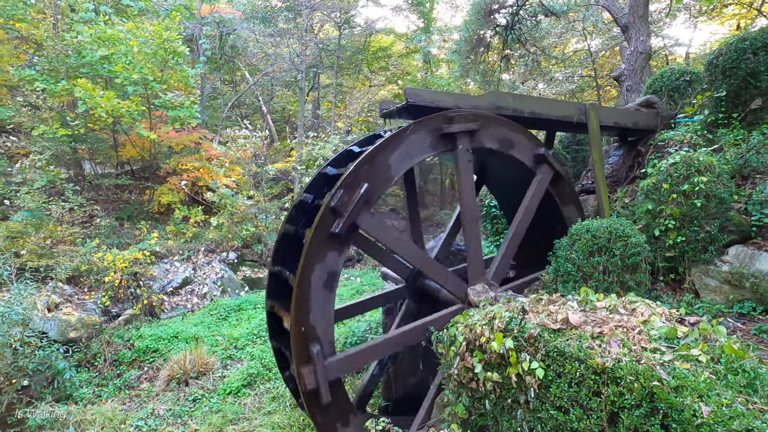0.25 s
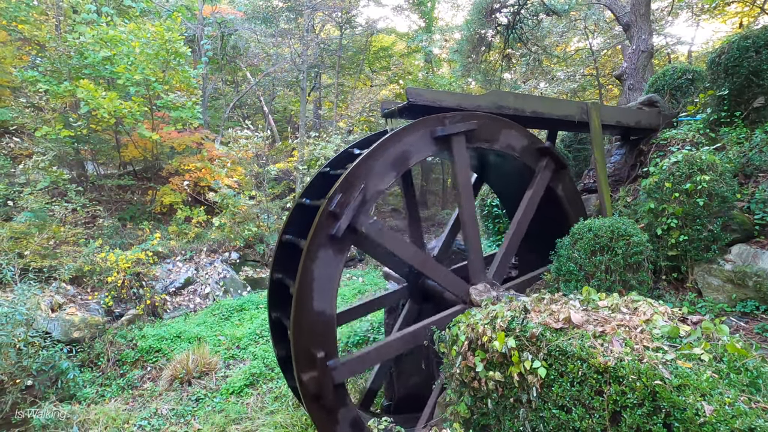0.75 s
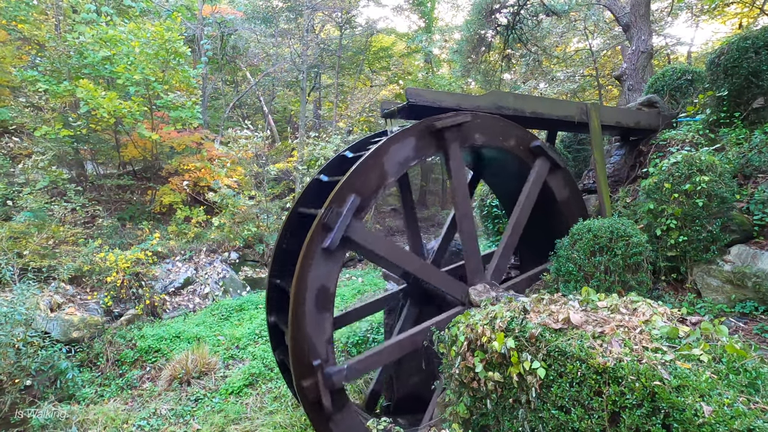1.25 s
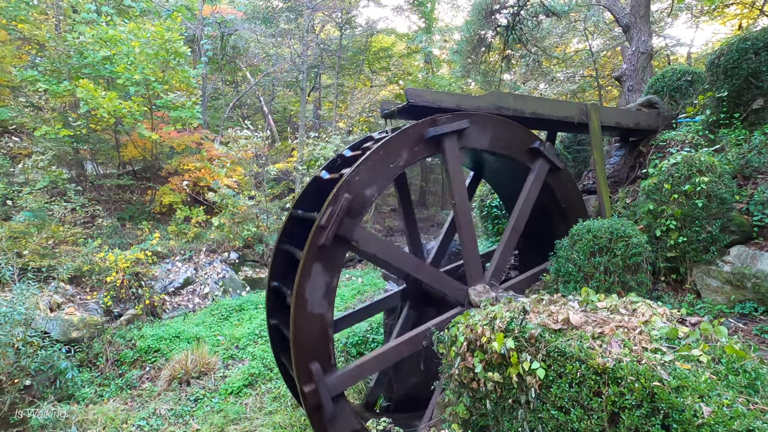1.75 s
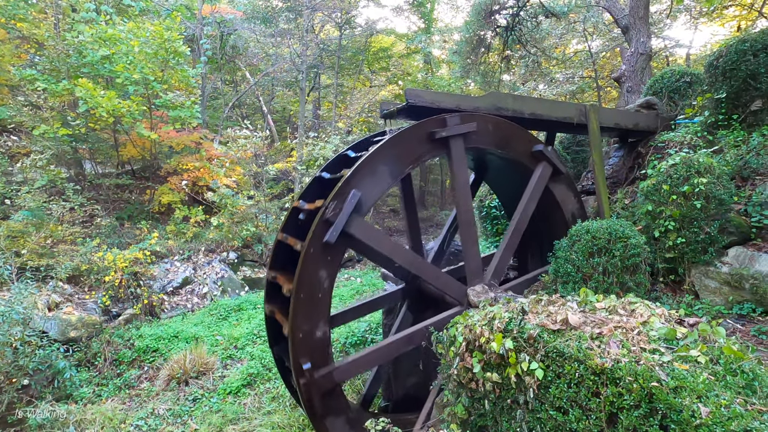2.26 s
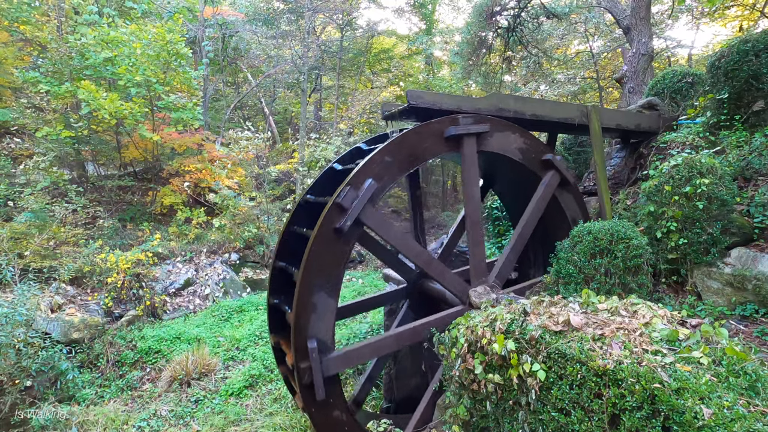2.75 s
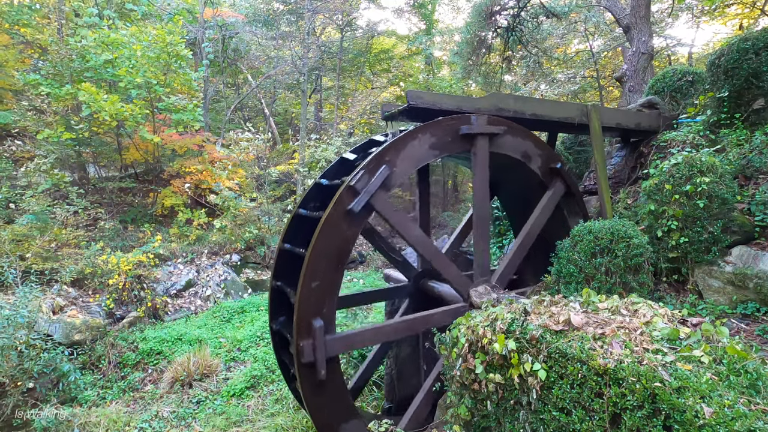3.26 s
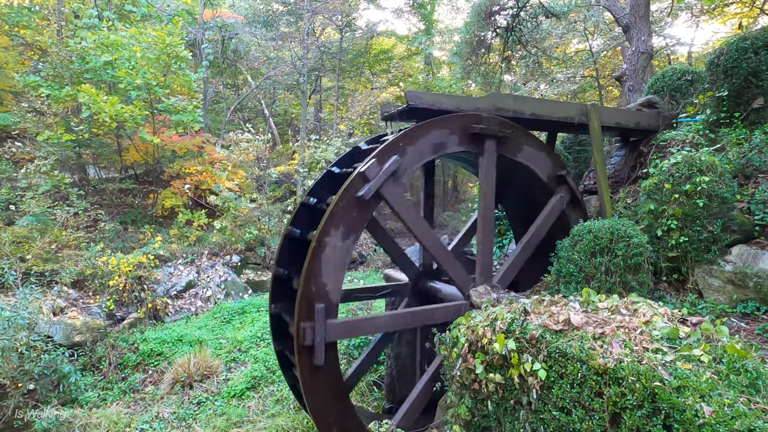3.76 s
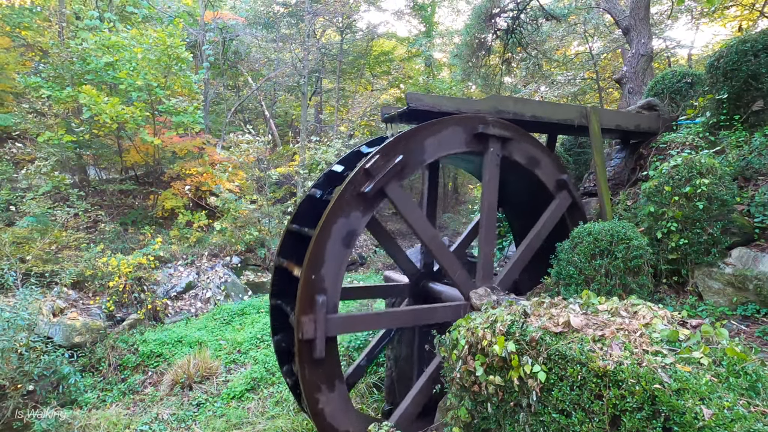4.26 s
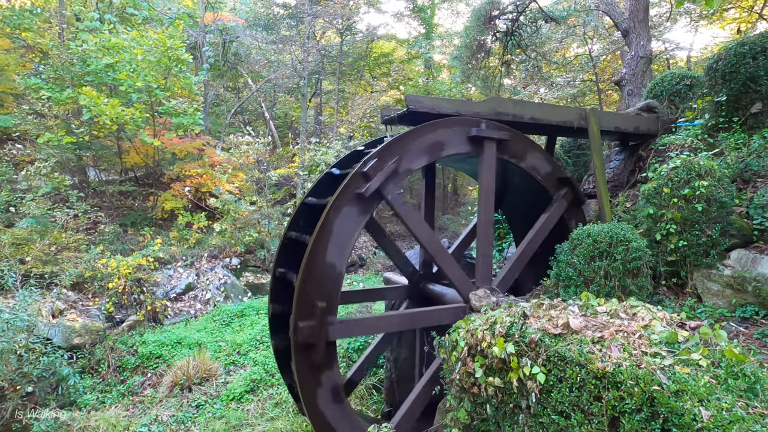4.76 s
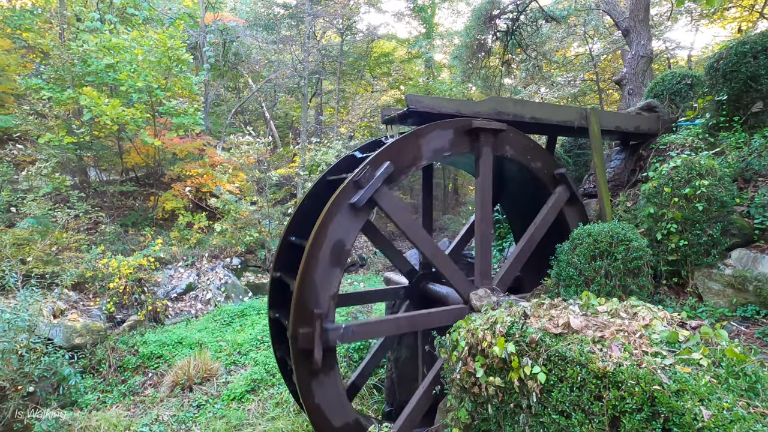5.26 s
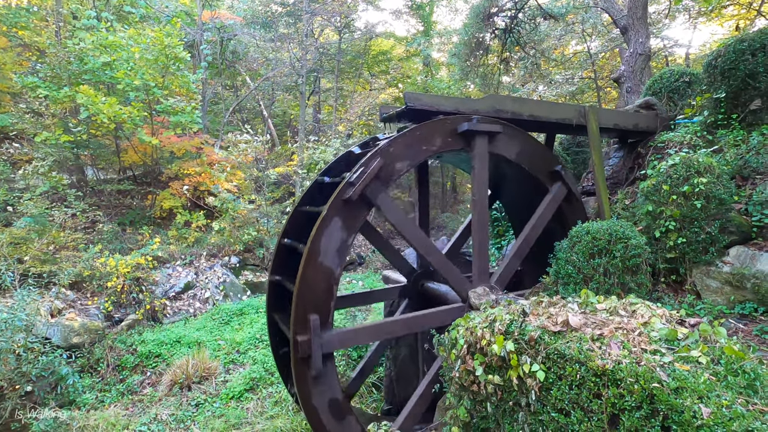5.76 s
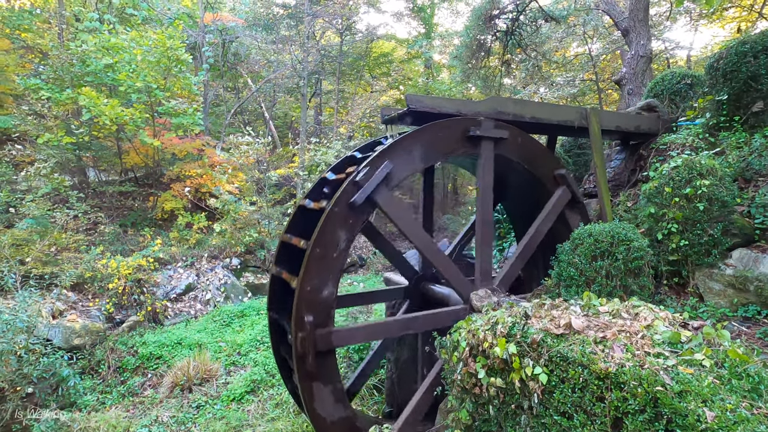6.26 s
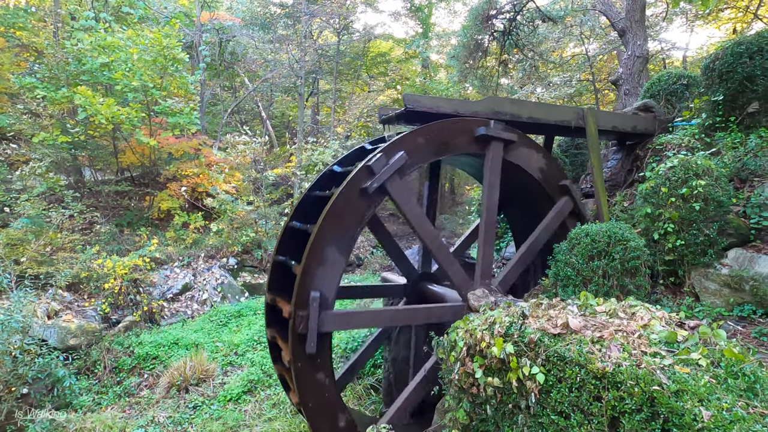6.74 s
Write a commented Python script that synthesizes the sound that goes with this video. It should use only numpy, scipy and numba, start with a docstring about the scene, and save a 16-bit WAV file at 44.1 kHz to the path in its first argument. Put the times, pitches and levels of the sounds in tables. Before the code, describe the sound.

Water spills from wheel buckets in irregular bursts: crisp loud drips, pattering droplets and small bubbly gurgles, fuller around two seconds and again near the end. The busiest, loudest drips come just before five seconds. Behind them lie a steady, flickering stream hiss, a low throbbing engine far away and two soft wind puffs. Outdoors, wide stereo, close to the water, with a short stony echo.

```python
"""Water spills from the buckets of a wooden garden wheel: drops tick and plink as short sines, trapped
bubbles gurgle as longer sines, most gliding upward, and thousands of tiny droplets fizz as spray.
All three echo in the wheel pit, over the hiss of the stream, made of flickering noise bands.
Far off an engine drones past as a few multiples of a bending firing rate, with a wavering hum;
low rumble and puffs of wind, both noise, lie underneath."""
import sys
import numpy as np
from scipy import signal
from scipy.fft import rfft, irfft, next_fast_len
from scipy.io import wavfile
from scipy.ndimage import uniform_filter1d, map_coordinates
from numba import njit

SR = 44100
rng = np.random.default_rng(int(sys.argv[2]) if len(sys.argv) > 2 else 0)


def transcribe(signal):
    """Save signal, clipped to [-1, 1], as a 16-bit WAV file at the path in sys.argv[1]."""
    frames = np.atleast_2d(signal).T
    limited = np.clip(frames, -1, 1)
    pcm = np.round(limited * 32767).astype(np.int16)
    wavfile.write(sys.argv[1], SR, pcm)


N = 308700
OPPOSITE = np.array([[1], [-1]])  # a part with opposite signs at the left and right microphones


def undb(db):
    """Gain of a dB value."""
    return 10 ** (np.asarray(db) / 20)


def level(x, db):
    """Scale to an rms level."""
    return x * undb(db) / np.sqrt(np.mean(x ** 2))


def curve(table):
    """Columns of a time table, joined by straight lines to one value a sample."""
    s, *columns = np.transpose(table)
    return [np.interp(np.arange(N) / SR, s, column) for column in columns]


def at_hz(table, hz):
    """Read (frequency [Hz], value) points on a log-frequency axis."""
    points_hz, values = np.transpose(table)
    return np.interp(np.log(hz), np.log(points_hz), values)


def band(hz, width):
    """Noise of rms 1 with a bell-shaped spectrum, drawn bin by bin."""
    size = next_fast_len(N)
    bins = np.zeros(size // 2 + 1, complex)
    lowest = max(1, int((hz - 3 * width) * size / SR))
    highest = min(size // 2, int((hz + 3 * width) * size / SR))
    k = np.arange(lowest, highest)
    bell = np.exp(-((k * SR / size - hz) / width) ** 2)
    bins[k] = bell * (rng.standard_normal((len(k), 2)) @ [1, 1j])
    return level(irfft(bins, size)[:N], 0)


def walk(rate):
    """Random levels every 1 / rate s, joined and smoothed; spread near 1."""
    k = int(SR / rate)
    joined = np.interp(np.arange(N) / k, np.arange(N // k + 2), rng.standard_normal(N // k + 2))
    return 1.4 * uniform_filter1d(joined, k)


def humps(s, db, length, rise, base_db):
    """Level in dB of a base plus humps that rise to their top at s and fall away; powers add.

    length spans the points at 1/e of the top power; rise is the share of it before the top."""
    late = np.arange(0, N + 64, 64)[:, None] / SR - s  # one row every 64 samples
    side_length = np.where(late < 0, rise, 1 - rise) * length
    shape = np.exp(-(late / side_length) ** 2)
    power = np.interp(np.arange(N) / 64, np.arange(len(late)), shape @ undb(db) ** 2)
    return 10 * np.log10(power + undb(base_db) ** 2)


@njit
def ring(length, start, hz, rise, t60, size, onset, shape):
    """Air pockets ring as sines that swell over the first cycles, glide in pitch and die.

    rise is in octaves per s, onset in radians of the sine; t60 in s takes the fade to -60 dB.
    Fade shape 1 is even, higher holds and then stops short."""
    out = np.zeros(length)
    for k in range(len(start)):
        first = int(start[k] * SR)
        last = min(length, first + int(.9 * t60[k] * SR))
        phase = 0.
        step = 2 * np.pi * hz[k] / SR
        climb = 2 ** (rise[k] / SR)
        for i in range(first, last):
            fade = 1000 ** -((i - first) / (t60[k] * SR)) ** shape
            swell = np.sin(np.pi / 2 * min(phase / onset, 1.)) ** 2
            out[i] += size[k] * fade * swell * np.sin(phase)
            phase += step
            step = min(step * climb, 2.5)
    return out


def pit(x, db):
    """Stone and boards under the wheel throw back single echoes that thicken into a short tail.

    db is the echo energy against the direct sound."""
    t60_s, gap_s = 0.065, 0.0016  # exponential part of the fade; silence before the first echo
    t = np.arange(int(.2 * SR)) / SR
    arrive = rng.random(len(t)) < t / .03  # sparse at first, every sample after 30 ms
    fade = 1000 ** (-t / t60_s) / np.sqrt(t + 0.00013)
    echoes = rng.standard_normal(len(t)) * fade * (t > gap_s) * arrive
    echoes = echoes * undb(db) / np.sqrt(np.sum(echoes ** 2))
    return x + signal.oaconvolve(x, echoes)[:N]


def spill():
    """How much water falls, as a level in dB: a thin trickle, the pours and the slops."""
    # buckets emptying: (time of fullest flow [s], level [dB], length [s])
    pours = [(0.19, -50, 0.65), (0.642, -44, 0.26), (0.9, -50, 0.15), (1.269, -52, 0.3), (2.097, -44.5, .3),
             (3.125, -52, 0.81), (4.79, -46.5, 0.59), (5.476, -48.5, 0.19), (6.26, -42, .19)]
    # short slops between the pours: (time of fullest flow [s], level [dB])
    slops = [(.98, -48), (1.029, -45), (1.17, -47), (1.518, -47.5), (1.63, -46), (1.775, -49), (1.872, -46),
             (2.36, -50), (2.54, -52), (2.94, -46), (3.34, -45), (3.49, -49), (3.8, -47.5), (3.91, -48),
             (4.08, -48), (4.191, -48), (4.37, -45), (5.13, -47), (5.788, -49), (6.041, -44), (6.965, -46)]
    trickle_db, slop_s = -55, 0.042
    pour_rise, slop_rise = .4, 0.6  # share of the length spent rising
    steady_db = humps(*np.transpose(pours), pour_rise, trickle_db)
    s, db = np.transpose(slops)
    return humps(s, db, slop_s, slop_rise, steady_db)


def spray(spill_db, count=13000):
    """Countless droplets in small flurries, denser and louder while more water spills.

    Most tick for a few cycles, few ring; half of them land further to the right."""
    # colour of the droplets: (pitch [Hz], relative level [dB])
    colour = [(500, -26), (1200, -16), (2500, 1), (4500, 4.5), (6800, 1.5), (7700, 4.5), (10000, -14),
              (14000, -12)]
    when, pitch, size, length = rng.random((count, 4)).T
    crowd_db = .4 * (spill_db - spill_db.mean())  # this part of the spill's power comes as more droplets
    crowd = np.cumsum(undb(2 * crowd_db))
    s = np.interp(when, crowd / crowd[-1], np.arange(N) / SR)
    sample = (s * SR).astype(int)
    hz = 500 * 28 ** pitch
    flurry_db = spill_db - crowd_db + 1.9 * walk(35.0)
    scatter_db = np.clip(2.9 - .15 * crowd_db[sample], 2.2, 3.4)  # thin flow patters, full flow washes
    size_db = scatter_db * (np.minimum(-np.log(1 - size), 4.0) - 1)
    db = flurry_db[sample] + at_hz(colour, hz) + size_db + 7.5
    rise = 60 * length  # octaves per s
    t60 = (2.7 + 16 * length ** 6) / hz
    rows = np.array([s, hz, rise, t60, undb(db)])
    ahead, aside = (pit(ring(N, *half.copy(), 2 * np.pi * 1.27, 1.78), -1.5)
                    for half in np.split(rows, 2, axis=1))
    return ahead + np.array([np.roll(aside, 1), aside])  # a sample later at the left


def bed(spill_db, roar_db):
    """Rumble and hiss in third-octave bands that flicker alone; bass follows the engine, treble the spill."""
    # rumble and stream: (frequency [Hz], relative level per Hz [dB])
    spectrum = [(24, -32), (40, 6.5), (69, -4), (192, 1.5), (342, -14.5), (817, -23.5), (1050, -22),
                (1350, -13), (1820, -16), (2060, -18), (3840, -20), (7710, -27.5), (12700, -42.5),
                (15500, -70)]
    # left-right likeness of the noise: (frequency [Hz], correlation [0-1])
    likeness = [(40, 0.98), (80, 0.99), (150, 0.92), (400, 0.79), (1200, 0.092), (3000, 0.55), (8000, 0.13),
                (13000, 0.033)]
    # the stream hisses in hollows of the pit: (centre [Hz], width [Hz], level [dB])
    hollows = [(1044, 100, -66.5), (1404, 83, -66), (2044, 60, -67)]
    bands_db = -44  # rms of all third-octave bands together
    out = 0
    fizz_db = .75 * (spill_db - spill_db.mean()) + 2.0 * walk(30.0)
    rumble_db = 0.37 * (roar_db - roar_db.mean())
    for hz in 40 * 2 ** np.arange(0, 8.7, 1 / 3):
        like = at_hz(likeness, hz)
        shared = np.sqrt(1 + like) * band(hz, hz / 6)
        apart = np.sqrt(1 - like) * band(hz, hz / 6) * OPPOSITE
        treble = np.clip(np.log2(hz / 900) / 2.84, 0, 1)
        bass = np.clip(np.log2(900 / hz), 0, 1)
        band_db = at_hz(spectrum, hz) + 10 * np.log10(hz)  # wider bands hold more power
        out = out + (shared + apart) * undb(band_db + 1.91 * walk(9.0) + treble * fizz_db + bass * rumble_db)
    hollow = sum(undb(db + 3.0 * walk(25.02)) * band(hz, width) for hz, width, db in hollows)
    return level(out, bands_db) + hollow


def low_multiples(roar_db):
    """Levels of the lowest engine multiples: tied to the roar, lifted by their own swells."""
    # level between swells: (multiple of the firing rate, level against the roar [dB])
    lower = [(1, -25), (2, -2), (3, -1.5)]
    # a low multiple swells and sinks back: (time of the top [s], multiple, level [dB], length [s])
    swells = [(0.182, 1, -46, 0.25), (0.198, 2, -43.5, 1), (1.645, 2, -46.5, 0.24), (3.203, 1, -49.5, 0.92),
              (3.808, 2, -41, 0.35), (5.27, 2, -51, 0.73)]
    rise_share = 0.23
    s, multiple, db, length = np.transpose(swells)
    levels = []
    for k, relative_db in lower:
        own = multiple == k
        levels.append(humps(s[own], db[own], length[own], rise_share, roar_db + relative_db))
    return levels


def engine(hz, low_db, roar_db):
    """Multiples of the firing rate nearly in step, so that firings throb; each flutters as the air path shifts."""
    # upper multiples: (multiple of the firing rate, level against the roar [dB])
    upper = [(4, -4), (5, -10.5)]
    phase = 2 * np.pi * np.cumsum(hz * (1 + 0.0022 * walk(6.07))) / SR
    multiples = list(enumerate(low_db, 1)) + [(k, roar_db + db) for k, db in upper]
    out = 0
    for k, db in multiples:
        sway = 0.3 / k * walk(3.0) * OPPOSITE  # the two sides drift apart in phase
        tone = np.cos(k * phase + .5 * walk(4.36) + sway)
        out = out + np.sqrt(2) * undb(db + 1.24 * walk(3.78)) * tone
    return out


def hum(hz, roar_db):
    """A second line, one sine, that bends with the engine and wavers in level and phase."""
    # hum: (highest pitch before the phase wavers [Hz], middle level [dB])
    hum_line = (197, -55)
    top_hz, middle_db = hum_line
    phase = 2 * np.pi * np.cumsum(top_hz * hz / hz.max()) / SR + 1.72 * walk(9.0)
    db = middle_db + 0.28 * (roar_db - roar_db.mean()) + 1.7 * walk(4.4)
    return np.sqrt(2) * undb(db) * np.cos(phase)


def wind():
    """Slow buffeting of low noise, partly unrelated at the two microphones."""
    # gusts on the microphones: (time of the top [s], level of each of two noises [dB], length [s])
    gusts = [(1.745, -43.5, 0.25), (5.35, -40.5, 0.26)]
    breeze_db, rise_share = -72, 0.39
    db = humps(*np.transpose(gusts), rise_share, breeze_db + 2.5 * walk(2.9))
    return undb(db) * (band(35.0, 42) + band(21, 25) * OPPOSITE)


def drops(count=3):
    """Each loud drop is a slap and a few cycles at its own pitch; softer ones ring longer.

    Drops land in a few places with their own echoes."""
    # loud drops: (time [s], level before a 3.5 dB lift [dB], first pitch [Hz])
    drop_table = [(0.0891, -25, 3980), (0.2159, -33, 5320), (0.427, -32, 3190), (0.4744, -28, 2110),
                  (0.545, -36, 1800), (0.573, -24.5, 3060), (0.61, -33, 3440), (0.658, -33, 4360),
                  (0.6826, -25, 4530), (0.69, -22, 4260), (0.806, -23, 3900), (1.014, -26.5, 2400),
                  (1.209, -27, 4440), (1.271, -27, 4200), (1.3585, -11.5, 5800), (1.8726, -33, 2670),
                  (2.0196, -21.5, 3530), (2.03, -21, 2330), (2.066, -27, 2680), (2.0834, -29, 2220),
                  (2.142, -19, 3380), (2.1467, -17.5, 4380), (2.42, -32, 5000), (2.5315, -28, 2240),
                  (2.881, -36, 2390), (2.9273, -28.5, 4280), (3.138, -22.5, 2740), (3.1918, -30, 3070),
                  (3.3004, -32, 2280), (3.312, -25, 4480), (3.3306, -31, 3030), (3.3786, -29.5, 3900),
                  (3.745, -35.5, 3020), (3.802, -31, 4560), (3.9085, -36, 4030), (4.049, -34, 3380),
                  (4.065, -30, 4600), (4.1805, -33, 2270), (4.2764, -18, 2240), (4.3477, -18.5, 3830),
                  (4.374, -29, 5440), (4.5372, -16.5, 3460), (4.5978, -27, 3050), (4.7049, -17, 4900),
                  (4.753, -22, 2810), (4.776, -28, 4340), (4.822, -29, 4700), (4.841, -8.5, 3150),
                  (4.892, -32, 2880), (4.9118, -22, 4450), (5.038, -14, 5540), (5.129, -30, 3030),
                  (5.152, -31, 2773), (5.182, -33, 6160), (5.362, -32, 2930), (5.484, -33, 3500),
                  (5.617, -32.5, 3500), (5.682, -30, 3350), (5.767, -21.5, 3520), (6.015, -31, 5100),
                  (6.0494, -38, 1930), (6.1913, -20, 4900), (6.228, -26, 3200), (6.248, -29.5, 2320),
                  (6.253, -23.5, 4230), (6.2957, -31, 2460), (6.3153, -23, 3460), (6.4486, -34, 3570),
                  (6.547, -27.5, 2630), (6.7009, -28.5, 2520)]
    s, db, hz = np.transpose(drop_table)
    out = 0
    for k in range(count):
        at, pitch, place_db = s[k::count] + .0005, hz[k::count], db[k::count]
        gain = undb(place_db + 3.5)
        steady = 0 * at
        plink_t60 = 10.0 * 2 ** (-(place_db + 28.5) / 24) / pitch
        plink = ring(N, at, pitch, 60 + steady, plink_t60, gain, 2 * np.pi * 1.9, 1.596)
        slap_hz = np.minimum(1.8 * pitch, 7600)
        slap = ring(N, at, slap_hz, steady, 4.0 / pitch, gain * undb(-12.0), 2 * np.pi * 1.1, 1.45)
        out = out + pit(plink + slap, -2.3)
    return out


def bubbles():
    """Big bubbles ring longer, glide up or down and gurgle in the choppy water."""
    # large bubbles: (time [s], level before wavering [dB], first pitch [Hz], rise [octaves/s], t60 [s])
    bubble_table = [(.193, -45.5, 850, 62, 0.041), (0.573, -35.5, 1780, -13, 0.02),
                    (1.903, -40, 1404, 33, 0.041), (1.94, -44, 1026, -5.5, 0.05),
                    (2.018, -36.5, 976, 1, 0.021), (2.044, -43, 624, -32, 0.027),
                    (2.057, -49.5, 453, 3.5, 0.14), (2.098, -49.5, 497, 19, 0.07),
                    (2.058, -32, 1420, 2, 0.017), (2.187, -45.5, 1225, -10, 0.045),
                    (2.209, -46, 1005, -0.5, 0.063), (3.197, -51, 483, 17, 0.12),
                    (3.232, -44, 930, 1, 0.016), (3.269, -40, 2040, 5, 0.017),
                    (3.299, -35.5, 2390, -1, 0.029), (3.314, -44, 698, 40.5, 0.072),
                    (3.387, -46.5, 1354, 5, 0.052), (4.346, -52.5, 595, 28, 0.096),
                    (4.557, -47, 584, 12, 0.04), (4.572, -45.5, 828, 56.5, 0.04),
                    (4.593, -46, 1250, 45, 0.03), (4.67, -45, 1440, 37, 0.053),
                    (4.683, -45.5, 1200, 56, 0.033), (4.748, -52, 793, 37.5, 0.05),
                    (4.891, -41.5, 1637, 2, 0.03), (4.964, -44, 1265, -5, 0.025),
                    (5.428, -35, 2580, 4, .022), (5.974, -45.5, 1354, 1, 0.057),
                    (6.206, -43, 712, 27.5, 0.071)]
    s, db, hz, rise, t60 = np.transpose(bubble_table)
    pure = ring(N, s, hz, rise, t60, undb(db), 2 * np.pi * .6, 2.5)
    wobble_s = 1.2e-4 * walk(90.0)  # shifting the time makes the pitch wobble
    bent = map_coordinates(pure, [np.arange(N) + SR * wobble_s], mode="nearest")
    return pit(undb(2.4 * walk(140.0)) * bent, -9.5)


def scene():
    """Water at the wheel over the stream, the far engine and the wind."""
    # engine: (time [s], firing rate [Hz], roar level [dB])
    engine_course = [(0.0, 41.11, -47), (1.12, 42.77, -48), (2.5, 43.31, -49), (5.35, 43, -50.5),
                     (6.5, 42.09, -55), (7.0, 41.1, -53)]
    spill_db = spill()
    hz, roar_db = curve(engine_course)
    water = drops() + bubbles() + spray(spill_db)
    far = engine(hz, low_multiples(roar_db), roar_db) + hum(hz, roar_db)
    return water + bed(spill_db, roar_db) + far + wind()


def record(dry):
    """Two microphones hear the spectrum unevenly and a moment apart; a steep low-pass cuts the top."""
    # balance of the sides: (frequency [Hz], left minus right [dB])
    balance = [(60, -0.5), (600, 2), (1200, 4), (2500, 2), (5000, -1.5), (12000, -3)]
    left_lag_s, top_hz = 1.0e-5, 15600
    size = next_fast_len(N)
    hz = np.arange(1, size // 2 + 2) * SR / size
    # half of the difference at each side
    left = undb(at_hz(balance, hz) / 2) * np.exp(-1j * np.pi * hz * left_lag_s)
    wet = irfft(rfft(dry, size) * np.array([left, 1 / left]), size)[:, :N]
    return signal.sosfilt(signal.ellip(10, .2, 70, top_hz, fs=SR, output="sos"), wet)


dry = scene()
out = record(dry)
transcribe(out)
```